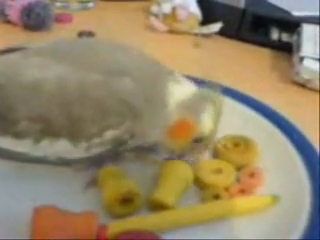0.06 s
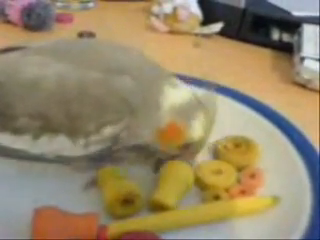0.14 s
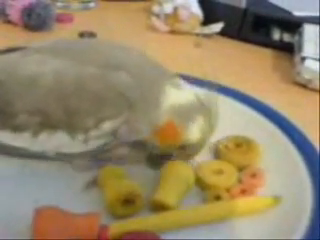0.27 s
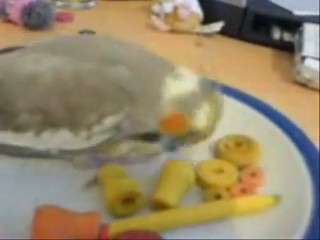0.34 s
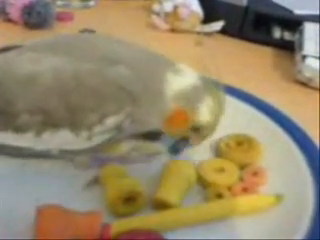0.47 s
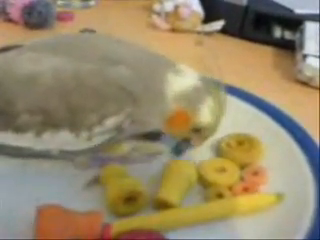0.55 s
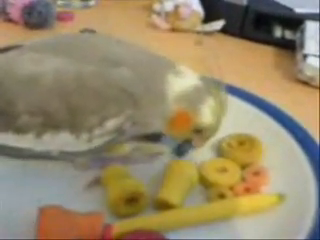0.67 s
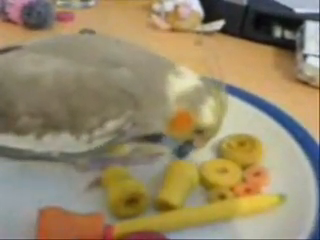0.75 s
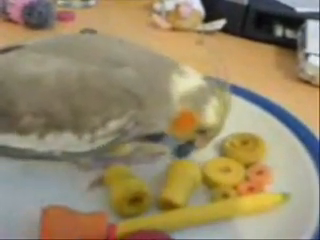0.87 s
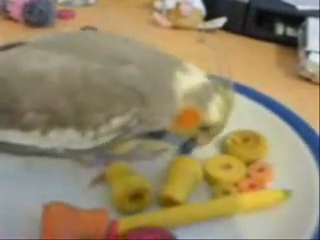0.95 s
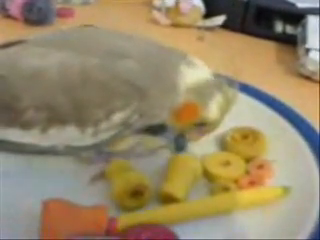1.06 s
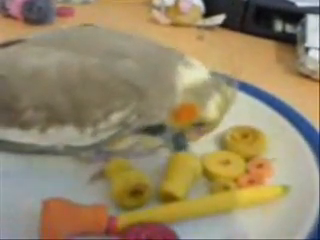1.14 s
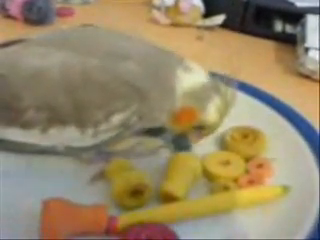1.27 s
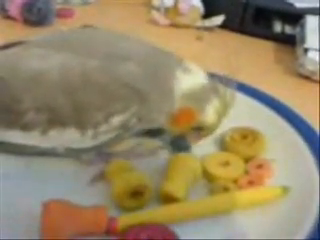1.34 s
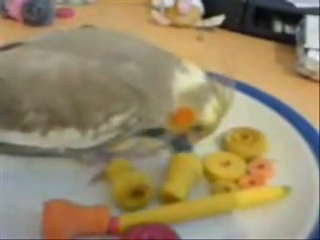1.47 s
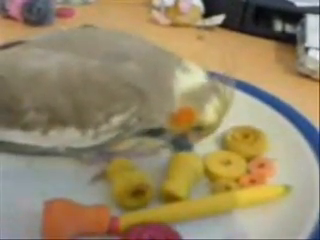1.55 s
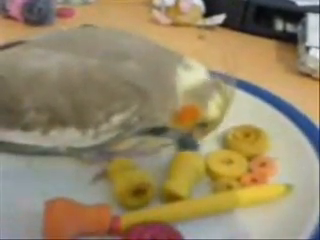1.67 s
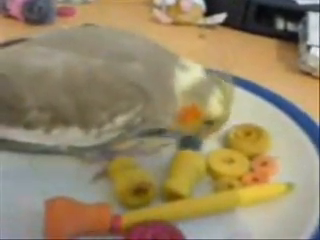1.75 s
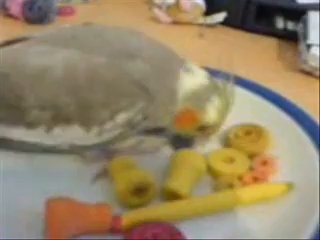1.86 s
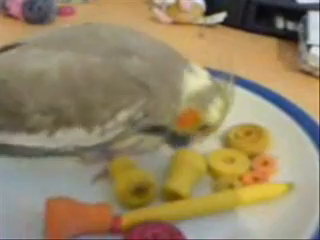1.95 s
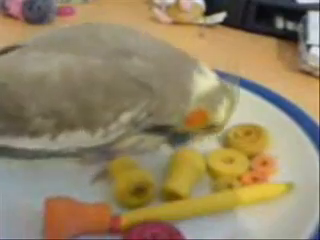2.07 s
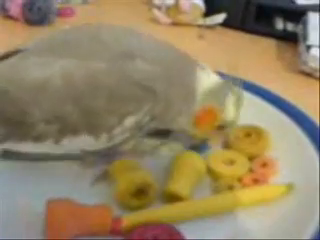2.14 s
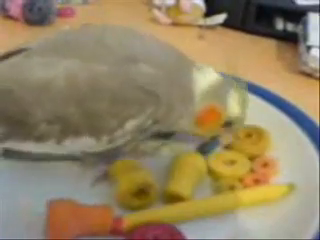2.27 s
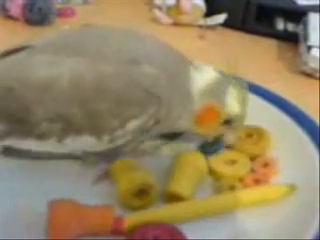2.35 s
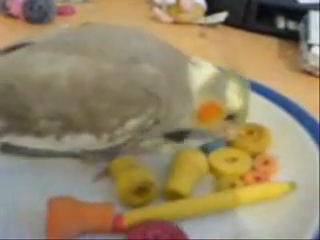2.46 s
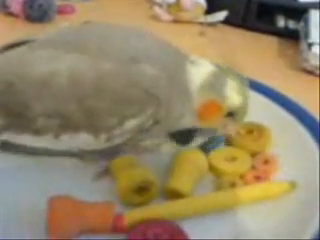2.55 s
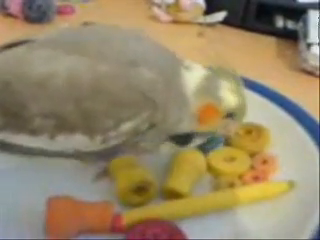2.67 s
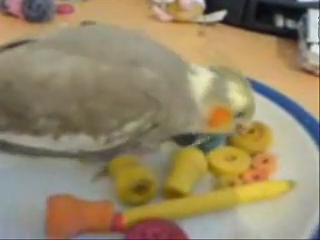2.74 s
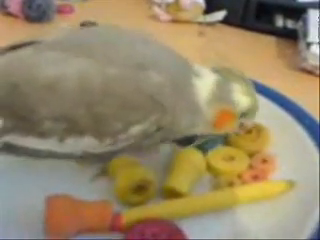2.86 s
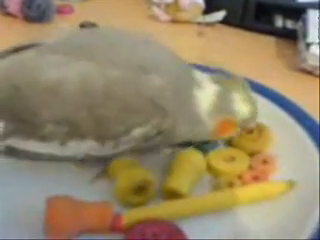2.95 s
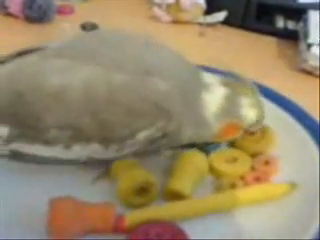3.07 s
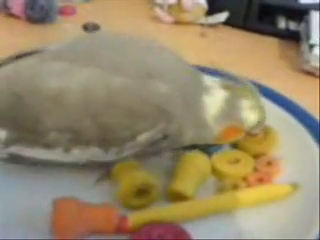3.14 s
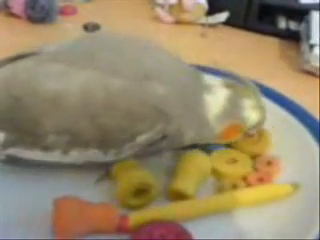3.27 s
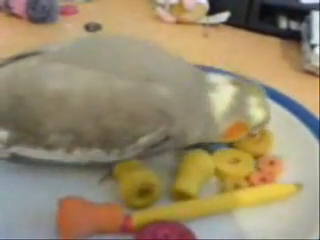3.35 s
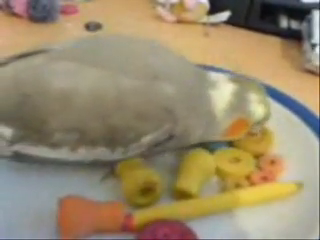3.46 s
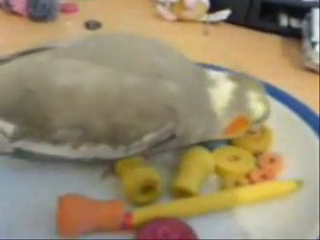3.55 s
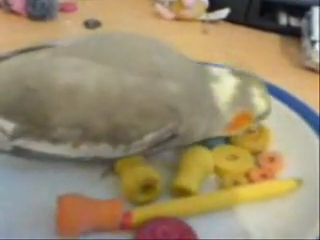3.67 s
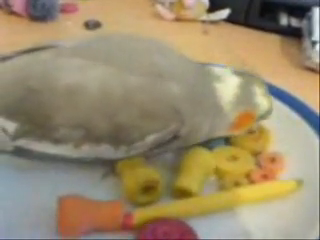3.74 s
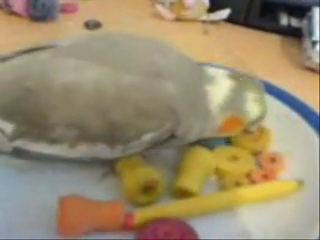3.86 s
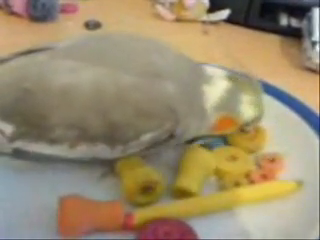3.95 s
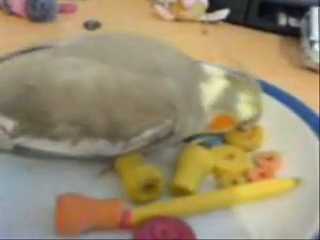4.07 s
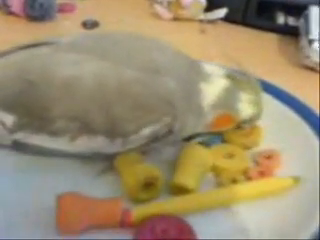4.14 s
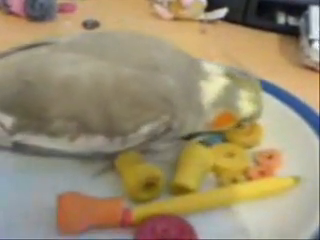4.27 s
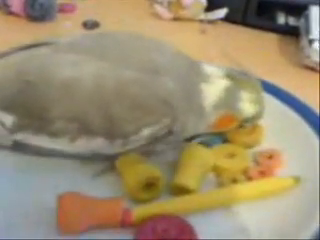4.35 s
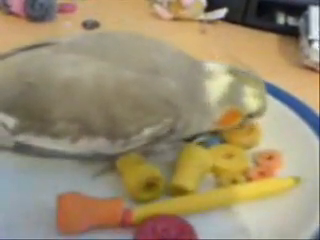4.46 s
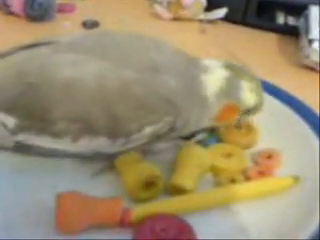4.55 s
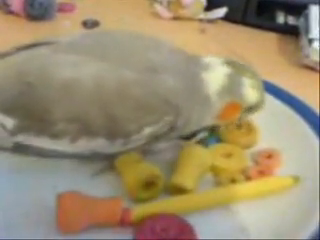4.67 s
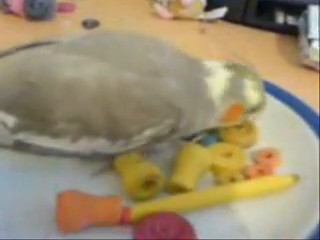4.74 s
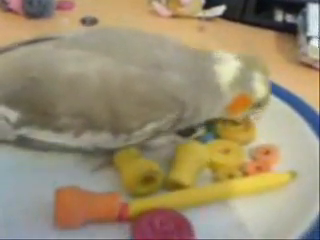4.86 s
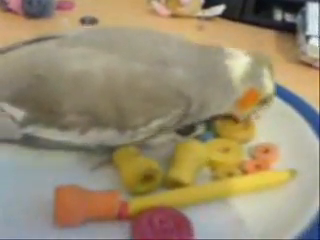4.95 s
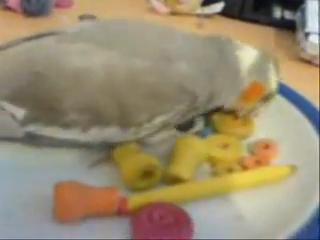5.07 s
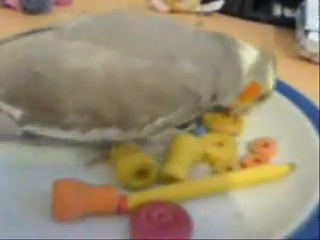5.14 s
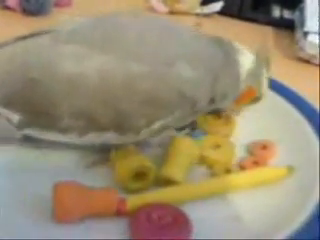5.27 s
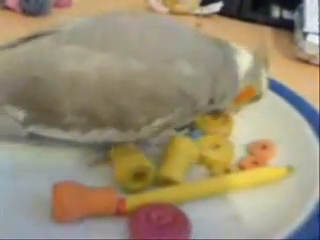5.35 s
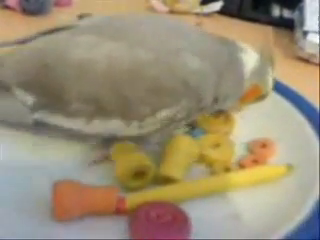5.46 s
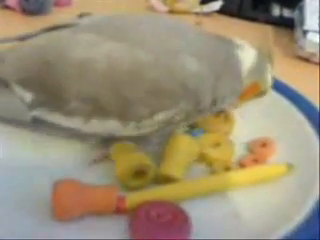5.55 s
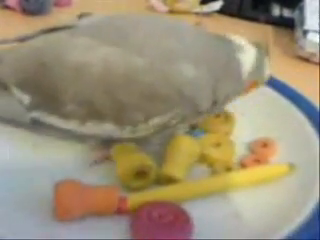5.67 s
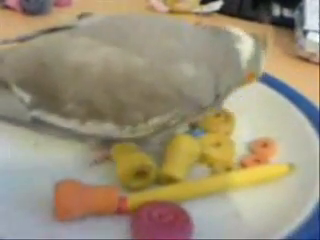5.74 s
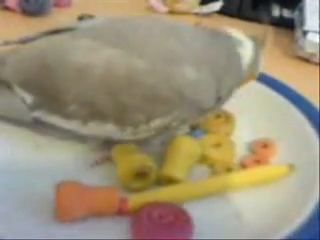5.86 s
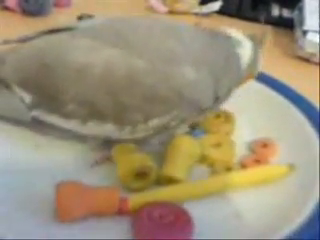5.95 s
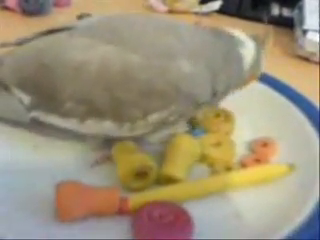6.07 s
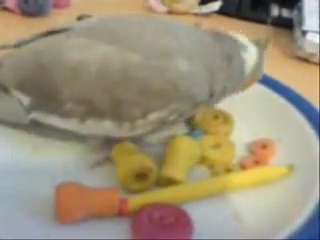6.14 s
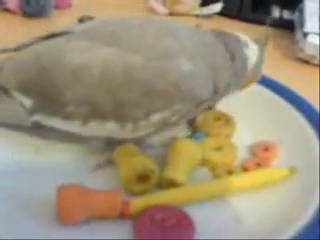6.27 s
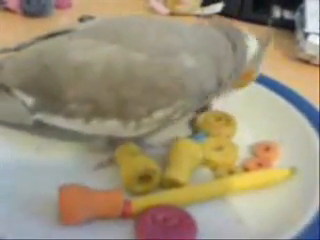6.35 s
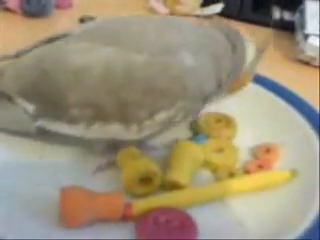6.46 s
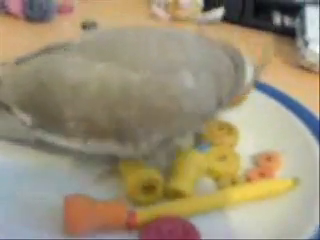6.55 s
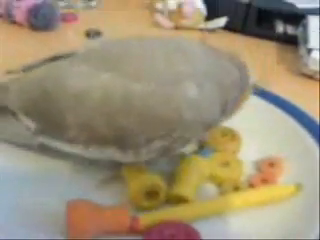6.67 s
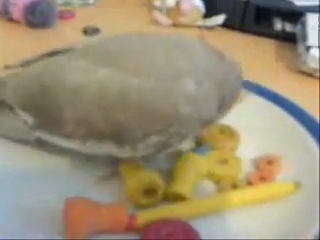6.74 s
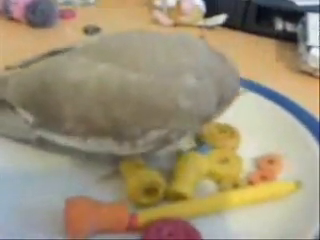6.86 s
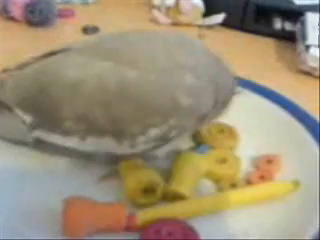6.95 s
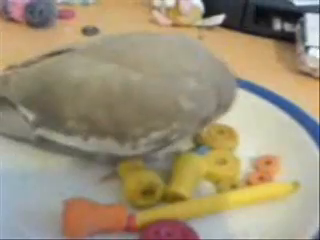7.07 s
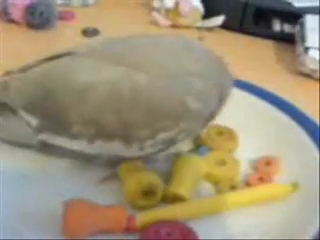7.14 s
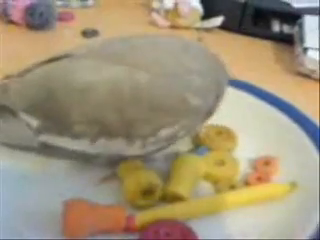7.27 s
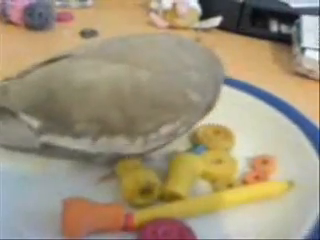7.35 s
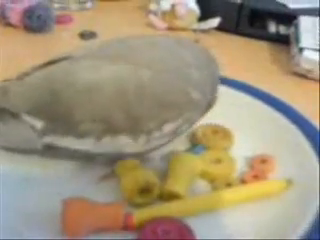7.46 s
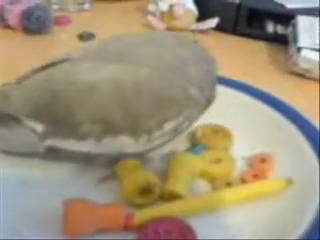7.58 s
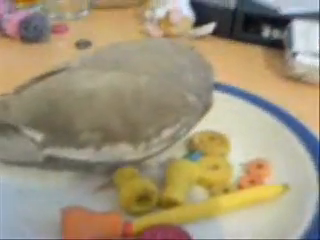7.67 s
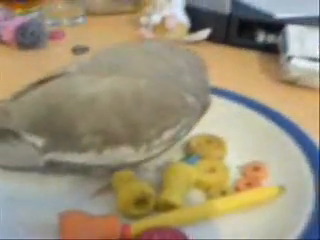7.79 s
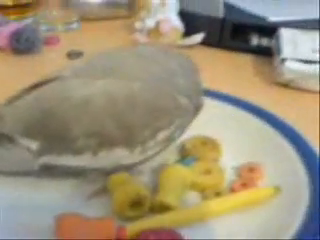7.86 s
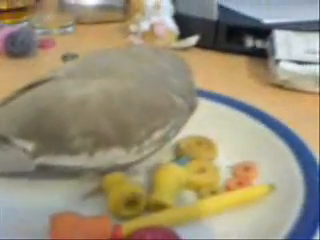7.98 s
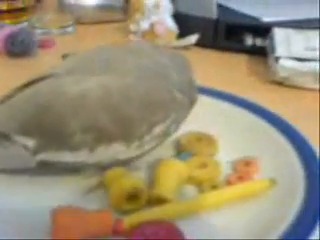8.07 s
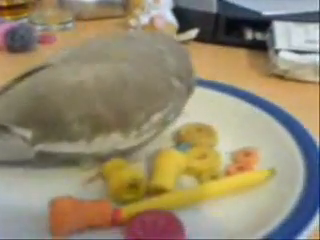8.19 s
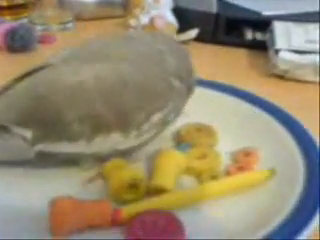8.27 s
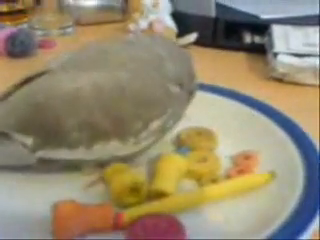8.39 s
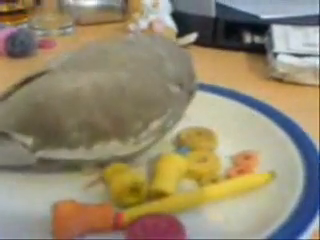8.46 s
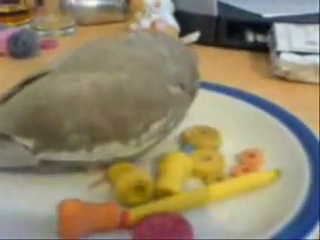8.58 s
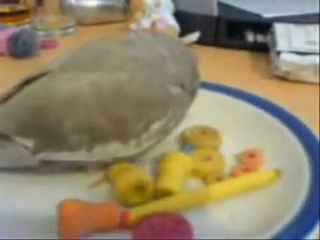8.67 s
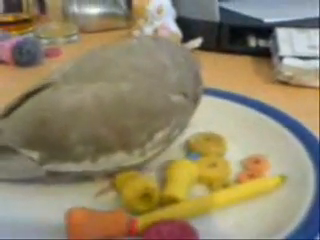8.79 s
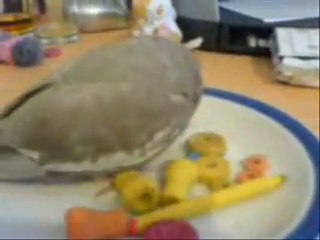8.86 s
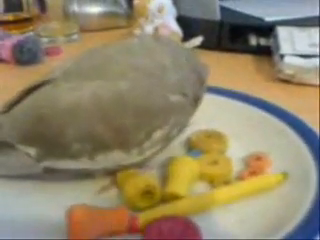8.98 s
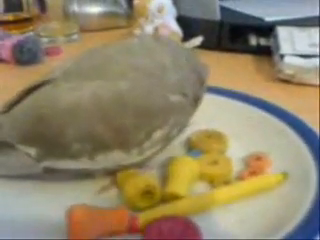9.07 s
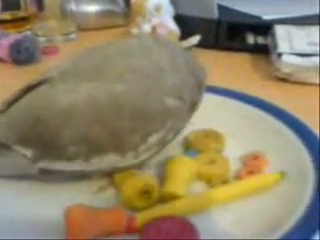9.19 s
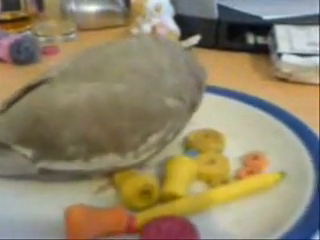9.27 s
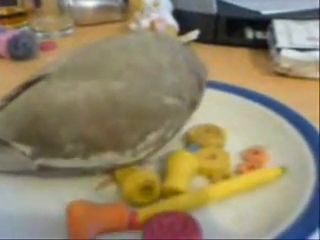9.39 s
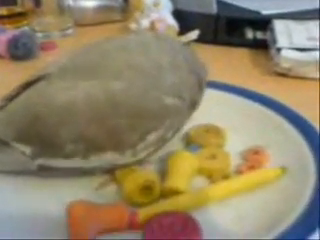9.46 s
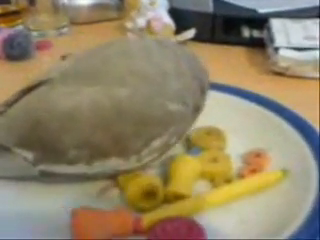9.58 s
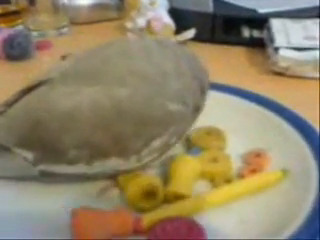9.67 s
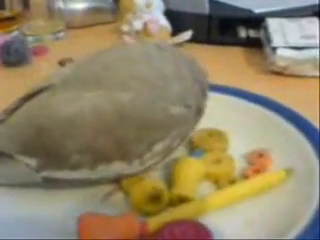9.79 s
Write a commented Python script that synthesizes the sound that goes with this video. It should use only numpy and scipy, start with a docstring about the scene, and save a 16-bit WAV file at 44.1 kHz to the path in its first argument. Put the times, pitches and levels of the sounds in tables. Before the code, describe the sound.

A cockatiel nudges hollow plastic toys on a ceramic plate with small clicks, one loud clink and two hoarse, trembling whistles over fan hum.

```python
"""A cockatiel nudges hollow plastic toys around a ceramic plate: damped ringing modes click, slips chatter,
and the plate clinks, once loudly. Its beak snaps in short knocks, its claws scuff in swells of noise,
and it gives two soft whistles, trembling tones with a hoarse rasp. A fan hums in the small room as shaped noise.
A cheap converter holds each of its 8000 samples a second, which mirrors every sound into a glassy treble."""
import sys
import numpy as np
from scipy import signal
from scipy.fft import rfft, irfft, next_fast_len
from scipy.io import wavfile
from scipy.ndimage import map_coordinates

SR = 44100
rng = np.random.default_rng(int(sys.argv[2]) if len(sys.argv) > 2 else 0)


def store_pcm(level_fs):
    """Save levels as 16-bit WAV."""
    pcm = np.round(np.clip(level_fs, -1, 1) * 32767).astype(np.int16)
    wavfile.write(sys.argv[1], SR, np.atleast_2d(pcm).T)


N = 433062
T = np.arange(N) / SR

# Toy touches the plate. Each row: start in seconds, level in dB, pitch of the main mode in Hz,
# t60 of the main mode in seconds, scratch in dB against the ring.
TAPS = [(0.2988, -11, 2780, .036, -23), (0.3414, -26, 2786, .035, -24), (0.494, -36, 2810, .025, -13),
        (0.526, -24.5, 2865, .02, -16), (0.592, -15, 2763, 0.027, -24), (2.258, -18.5, 2800, .028, -10),
        (2.467, -34, 2780, .028, -18), (2.5122, -31.5, 2820, 0.045, -20), (2.844, -13.5, 2793, .026, -18),
        (4.874, -20.5, 2780, .02, -11), (4.896, -17, 2760, 0.038, -9), (5.877, -20.5, 2812, .04, -15),
        (5.924, -37, 3050, .035, -17), (6.9253, -24, 2740, 0.029, -16), (7.137, -35, 2790, .028, -18),
        (7.158, -31, 2760, .03, -18)]
# Toy dragged over the glaze. Each row: start in seconds, end in seconds, level in dB rms.
DRAGS = [(.31, .338, -41), (.348, .37, -45), (0.576, 0.597, -38), (.6, .632, -45), (.64, 0.713, -50.5),
         (2.275, 2.335, -46.5), (5.835, 5.915, -40), (5.882, 5.902, -42), (6.893, 6.925, -51),
         (7.04, 7.105, -46), (7.09, 7.19, -52)]
# Modes of a hollow toy; each tap rescales pitch and t60. Each row: pitch in Hz, level in dB,
# t60 in seconds, rise in seconds.
TOY_MODES = [(2802, 0, 0.029, 0.0013), (2720, -15, 0.018, 0.00036), (2940, -16, 0.014, 0.0004),
             (2813, -27, 0.11, 0.003)]
# A toy strikes the plate and bounces. Each row: start in seconds, level in dB,
# tilt of the upper modes in dB per octave.
CLINKS = [(0.299, -32, 12), (4.897, -6.5, 5), (5.156, -52, -24), (5.177, -41, 3), (5.2, -43, -10),
          (5.408, -43, 3), (6.243, -44, -15)]
# A toy rocks on the plate's rim. Each row: start in seconds, end in seconds, level in dB rms.
ROCKING = [(5.155, 5.245, -54), (5.4, 5.45, -58)]
# Modes of the plate. Each row: pitch in Hz, level in dB, t60 in seconds, rise in seconds.
PLATE_MODES = [(3403, -2.5, 0.155, 0.0024), (3432, -20, 0.08, 0.003), (2086, -4, .2, 0.028),
               (2778, -13, 0.09, .001), (3205, -26, 0.12, .001), (2130, -21, 0.16, .004),
               (700, -18, 0.07, 0.00091), (2460, -24, 0.07, .001), (1150, -18, 0.045, .001)]
# Dry snaps of beak on plastic. Each row: start in seconds, level in dB, knock pitch in Hz.
SNAPS = [(0.298, -26, 1091), (0.718, -34, 1900), (1.1592, -17, 1630), (1.313, -22, 1560),
         (1.3335, -38, 1500), (4.875, -18, 1170), (4.879, -17.5, 1260), (6.243, -29, 1340),
         (9.059, -32, 2400)]
# Claws scuff the plate. Each row: start in seconds, length in seconds, level in dB.
SCUFFS = [(0.715, 0.0059, -26), (4.29, 0.007, -28), (4.883, 0.014, -27), (5.139, 0.018, -33.5),
          (5.677, 0.006, -34), (5.866, 0.016, -32), (8.099, 0.034, -38), (8.136, 0.027, -34),
          (8.2, 0.016, -32)]
# Whistles. Each row: start in seconds, end in seconds, shakiness from 0 to 1, room level in dB.
WHISTLES = [(1.97, 2.426, 1, -8.5), (8.203, 8.78, .45, -18)]
# Course of the voice, one curve for each whistle. Each row: time in seconds, pitch in Hz, level in dB,
# hoarseness (1 and above is all rasp).
SONG = [
    [(1.97, 2490, -38, 1.2), (1.99, 2692, -37, 0.7), (2.018, 2680, -34.5, .35), (2.04, 2640, -37.5, 0.1),
     (2.08, 2697, -35, .15), (2.11, 2680, -30, 0.2), (2.135, 2540, -32.5, 0.5), (2.16, 2394, -36.5, .35),
     (2.23, 2126, -36, 0.4), (2.26, 1974, -38, .3), (2.335, 1710, -37, 0.1), (2.37, 1713, -38, .2),
     (2.385, 1715, -52, .3), (2.41, 1750, -50, .2), (2.426, 1730, -52, .2)],
    [(8.203, 2433, -40, 1.1), (8.222, 2410, -33.5, 0.9), (8.24, 2442, -33.5, 0.4), (8.285, 2397, -26, 0.04),
     (8.312, 2346, -25.5, 0), (8.326, 2410, -29, 0.2), (8.356, 2375, -25.5, 0.07), (8.374, 2350, -24, .12),
     (8.39, 2230, -32.5, 0.3), (8.425, 2210, -24, 0.08), (8.475, 2192, -28, 0.14), (8.495, 2210, -26, 0),
     (8.542, 2211, -26, 0.13), (8.565, 2205, -37, 0.25), (8.6, 2167, -43, .3), (8.64, 2220, -33, .3),
     (8.657, 2202, -22.5, 0), (8.668, 2210, -33, 0.2), (8.683, 2215, -28, 0.2), (8.713, 2200, -28, 0.65),
     (8.727, 2260, -38, 0.5), (8.79, 2245, -56, .4)],
]
# Spectrum of the fan's rush, shape only. Each row: frequency in Hz, relative level in dB per Hz.
AIR = [(15, -76.5), (25, -29), (143, -18), (173, -14.5), (208, -26), (230, -3.5), (283, -1), (313, -5),
       (418, -10.5), (503, -6.5), (546, -11.5), (774, -15), (840, -12), (931, -15.5), (3400, -25),
       (4420, -72), (7480, -120)]
# Hum of the fan and its casing. Each row: centre in Hz, spread in Hz (6 dB down at 0.65 of it to each side),
# level in dB rms.
HUM = [(183, 14, -60), (244.2, 26, -50), (285.6, 9.7, -46), (504.7, 4.8, -49), (849, 120, -57)]
# Spectrum of the electronics, shape only. Each row: frequency in Hz, relative level in dB per Hz.
HISS = [(3500, 7), (4400, 4), (4800, 16.5), (7000, 9.5), (9000, -28), (10300, -17), (10800, -34),
        (11500, 11), (14500, 9.5), (15500, -19)]

# Chatter of a toy settling after a tap: 35 dB under the tap
SETTLE_DELAY_S, SETTLE_S, SETTLE_LOSS_DB = 0.0068, 0.042, 35
SLIP_SPREAD_DB, TICK_DB, TICK_T60_S = 3, -13, 0.006
LOWEST_TILT_HZ = 1600  # modes under this ring alike wherever the plate is hit
BUZZ_DB, BUZZ_RATE_HZ = 1.5, 170  # level wobble of the plate's ring
EDGE_S = 0.0028  # fade at both ends of a whistle
# Pitch depths are fractions of the pitch; jitter and flutter also scale with shakiness
JITTER, JITTER_RATE_HZ, FLUTTER_DB, FLUTTER_RATE_HZ = 0.011, 190, 2.6, 140
WAVER, WAVER_DB, WAVER_RATE_HZ = 0.0015, 0.6, 35
RASP_SPREAD_HZ, RASP_BELOW_HZ = 192, 110
HOLD_HZ, TOP_HZ = 8000, 15800


def toys(scratch_t60):
    """Each tap rings a hollow toy over a dry scratch; the beak's grip shifts the pitch and damps the ring."""
    out, t = np.zeros(N), T[:SR // 3]
    main_hz, _, main_t60, _ = TOY_MODES[0]
    for start, db, pitch_hz, ring_t60, scratch_db in TAPS:
        modes = [(hz * pitch_hz / main_hz, level, t60 * ring_t60 / main_t60, rise)
                 for hz, level, t60, rise in TOY_MODES]
        scratch = amp(scratch_db - 60 * t / scratch_t60) * grit(len(t), low_hz=700)
        add(out, start, amp(db) * (ring(modes, scatter_db=0.5) + scratch))
    return out


def chatter(strokes, modes, slips_per_s, pressed_t60):
    """Sliding or rocking makes tiny uneven slips; each ticks and rings the body, damped by the pressure."""
    out, t = np.zeros(N), T[:SR // 3]
    for start, end, db in strokes:
        length = max(round((end - start) * SR), 1)
        sizes = rng.choice([-1, 1], length) * amp(SLIP_SPREAD_DB * rng.standard_normal(length))
        happens = rng.random(length) < slips_per_s / SR
        slips = happens * sizes * signal.windows.tukey(length, 0.5)  # swells and eases
        tick = amp(TICK_DB - 60 * t / TICK_T60_S) * grit(len(t), low_hz=1000)
        pressed_ring = ring(modes, scatter_db=3) * amp(-60 * t / pressed_t60)
        sound = signal.fftconvolve(slips, pressed_ring + tick)
        to_unit_rms = np.sqrt(length / (np.sum(sound ** 2) + 1e-9))
        add(out, start, amp(db) * sound * to_unit_rms)
    return out


def plate(clatter_db, clatter_t60):
    """The ceramic rings over the toy's clatter; where the toy lands sets the balance of the modes."""
    out, t = np.zeros(N), T[:SR // 3]
    main_hz = PLATE_MODES[0][0]
    for start, db, tilt_db in CLINKS:
        modes = [(hz, level + tilt_db * np.log2(hz / main_hz) * (hz > LOWEST_TILT_HZ), t60, rise)
                 for hz, level, t60, rise in PLATE_MODES]
        clatter = amp(clatter_db - 60 * t / clatter_t60) * grit(len(t), low_hz=550)
        buzz = amp(BUZZ_DB * wobble(BUZZ_RATE_HZ)[:len(t)])
        add(out, start, amp(db) * (buzz * ring(modes, scatter_db=0.5) + clatter))
    return out


def beak(knock_t60, crack_db, crack_t60):
    """A snap is a couple of cycles of a damped knock with a short crackle."""
    out, t = np.zeros(N), T[:SR // 10]
    for start, db, hz in SNAPS:
        knock = amp(-60 * t / knock_t60) * np.sin(2 * np.pi * hz * t)
        crack = amp(crack_db - 60 * t / crack_t60) * grit(len(t), low_hz=590)
        add(out, start, amp(db) * (knock + crack))
    return out


def claws():
    """Each scuff is a brief swell of dry noise."""
    out = np.zeros(N)
    for start, length_s, db in SCUFFS:
        swell = np.hanning(round(length_s * SR))
        add(out, start, amp(db) * swell * grit(len(swell), low_hz=800))
    return out


def voice(t60):
    """The bird's head turns between its two whistles, so each has its own share of room."""
    return sum(room(whistle(start, end, shake, song), wet_db, t60)
               for (start, end, shake, wet_db), song in zip(WHISTLES, SONG))


def whistle(start, end, shake, song):
    """A nearly pure, trembling tone; where it turns hoarse it gives way to a rasp just under its pitch."""
    times, *columns = np.transpose(song)
    hz, db, hoarse = (np.interp(T, times, column) for column in columns)
    hoarse = np.clip(hoarse, 0, 1)
    tremble = shake * JITTER * wobble(JITTER_RATE_HZ) + WAVER * wobble(WAVER_RATE_HZ)
    phase = 2 * np.pi * np.cumsum(hz * (1 + tremble)) / SR
    # Two slow noises on a sine and a cosine make a noise band around the lowered pitch
    under = phase - 2 * np.pi * RASP_BELOW_HZ * T
    spread = lambda f: 1 / (1 + (f / RASP_SPREAD_HZ) ** 3)
    rasp = (noise(spread) * np.sin(under) + noise(spread) * np.cos(under)) / np.sqrt(2)
    gate = np.clip(np.minimum(T - start, end - T) / EDGE_S, 0, 1)
    flutter_db = shake * FLUTTER_DB * wobble(FLUTTER_RATE_HZ) + WAVER_DB * wobble(WAVER_RATE_HZ)
    tone = np.sqrt(1 - hoarse ** 2) * np.sin(phase)
    return gate * amp(db + flutter_db) * (tone + hoarse * rasp)


def fan(rush_db):
    """A steady rush of air with a few narrow, wavering hum bands."""
    out = amp(rush_db) * noise(lambda f: amp(along(AIR, f)))
    for hz, spread, db in HUM:
        out += amp(db) * noise(lambda f: 1 / (1 + ((f - hz) / (spread * 0.65)) ** 2))
    return out


def room(x, wet_db, t60):
    """The desk and near walls answer with a short diffuse tail."""
    t = T[:SR // 2]
    tail = rng.standard_normal(len(t)) * amp(-60 * t / t60) * (t > 0.003)
    return x + amp(wet_db) * signal.fftconvolve(x, tail / np.linalg.norm(tail))[:N]


def ring(modes, scatter_db):
    """One blow on a body: its modes swell and fade, at new strengths each time."""
    t, out = T[:SR // 3], 0
    for hz, db, t60, rise in modes:
        fade = amp(db + scatter_db * rng.normal() - 60 * t / t60)
        out = out + fade * (1 - np.exp(-t / rise)) * np.sin(2 * np.pi * hz * t)
    return out


def grit(count, low_hz):
    """A short run of contact noise: small light things make no bass."""
    highpass = signal.butter(2, low_hz, "high", fs=SR, output="sos")
    return signal.sosfilt(highpass, rng.standard_normal(count))


def noise(response):
    """Coloured noise of rms 1."""
    return unit(filtered(rng.standard_normal(N + SR // 2), response))


def wobble(rate):
    """A smooth random curve, rate knots a second."""
    return map_coordinates(rng.standard_normal(int(N * rate / SR) + 4), [T * rate])


def filtered(x, response):
    """x times a response of frequency."""
    m = next_fast_len(N + SR // 2)
    return irfft(rfft(x, m) * response(np.fft.rfftfreq(m, 1 / SR)), m)[:N]


def along(points, hz):
    """(Hz, value) points read on a log axis."""
    f, v = np.transpose(points)
    return np.interp(np.log(hz + 1), np.log(f + 1), v)


def amp(db):
    """Decibels to gain."""
    return 10 ** (np.asarray(db) / 20)


def unit(x):
    """x at rms 1."""
    return x / np.sqrt(np.mean(x ** 2) + 1e-20)


def add(track, start, sound):
    """Mix a sound into the track at a start in seconds."""
    part = track[round(start * SR):][:len(sound)]
    part += sound[:len(part)]


def scene():
    """Bird and toys close by, the fan behind them; a tapped toy chatters briefly as it settles."""
    settling = [(start + SETTLE_DELAY_S, start + SETTLE_DELAY_S + SETTLE_S, db - SETTLE_LOSS_DB)
                for start, db, *_ in TAPS]
    plastic = toys(scratch_t60=0.089)
    plastic += chatter(DRAGS + settling, TOY_MODES, slips_per_s=900, pressed_t60=0.2)
    ceramic = plate(clatter_db=-17, clatter_t60=0.12)
    ceramic += chatter(ROCKING, PLATE_MODES, slips_per_s=500, pressed_t60=0.068)
    bird = beak(knock_t60=0.006, crack_db=-4, crack_t60=0.016) + claws()
    near = room(plastic, wet_db=-10, t60=0.2)
    near += room(bird, wet_db=-13, t60=0.2)
    near += room(ceramic, wet_db=-16, t60=0.2)
    return (near + voice(t60=0.32) + fan(rush_db=-41.5))[None]


def record(dry):
    """Holding each sample mirrors the narrow band into the treble, over a steady electronic hiss
    plus faint broadband noise that rises and falls with the sound."""
    narrow = filtered(dry[0], lambda f: 1 / np.sqrt((1 + (f / 3540) ** 80) * (1 + (45 / (f + 1)) ** 6)))
    held = np.interp(np.floor(T * HOLD_HZ) / HOLD_HZ, T, narrow)
    smoothed = filtered(held, lambda f: 1 / np.sqrt(1 + (f / 10550) ** 200))
    steady_hiss = amp(-65.5) * noise(lambda f: amp(along(HISS, f)))
    level_following_noise = amp(-46) * smoothed * rng.standard_normal(N)
    return filtered(smoothed + steady_hiss + level_following_noise, lambda f: f < TOP_HZ)[None]


dry = scene()
out = record(dry)
store_pcm(out)
```